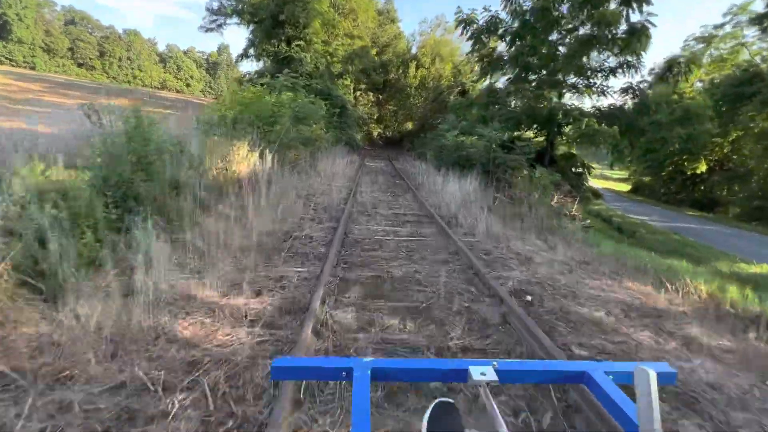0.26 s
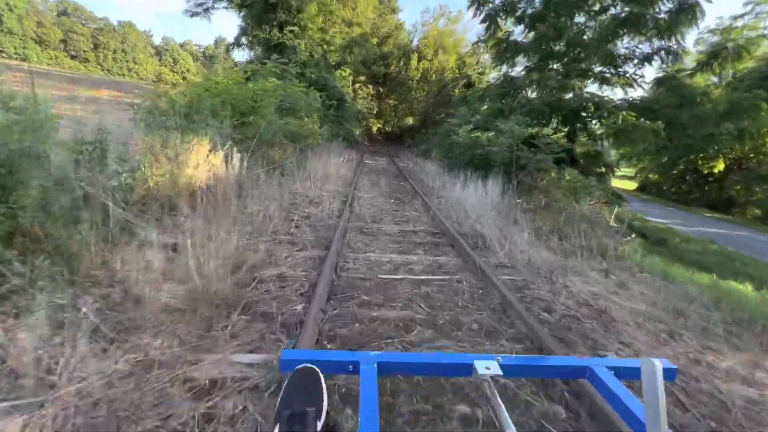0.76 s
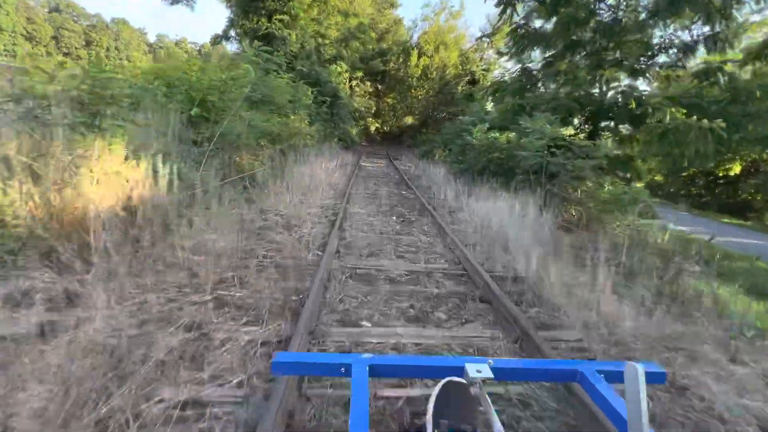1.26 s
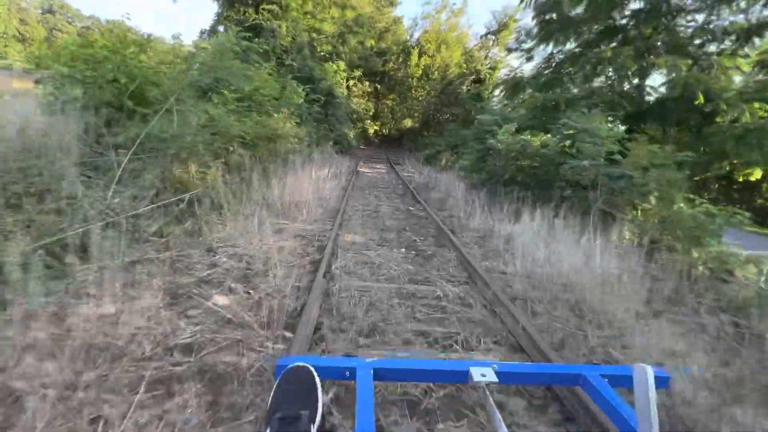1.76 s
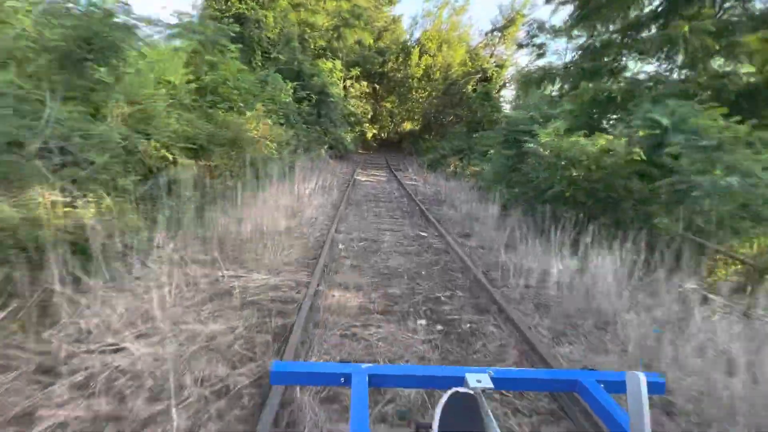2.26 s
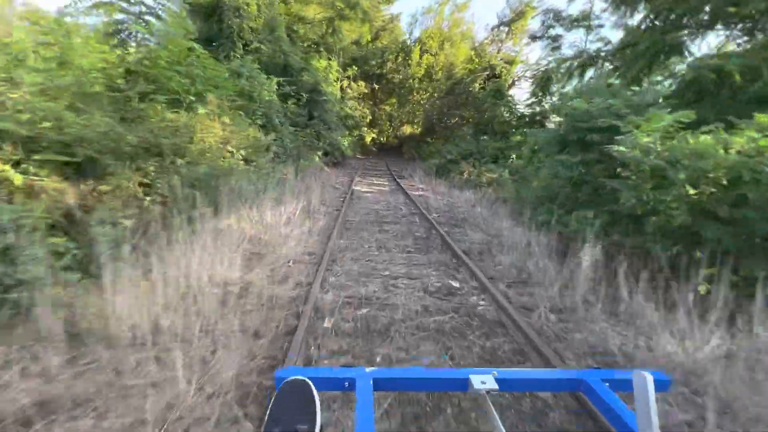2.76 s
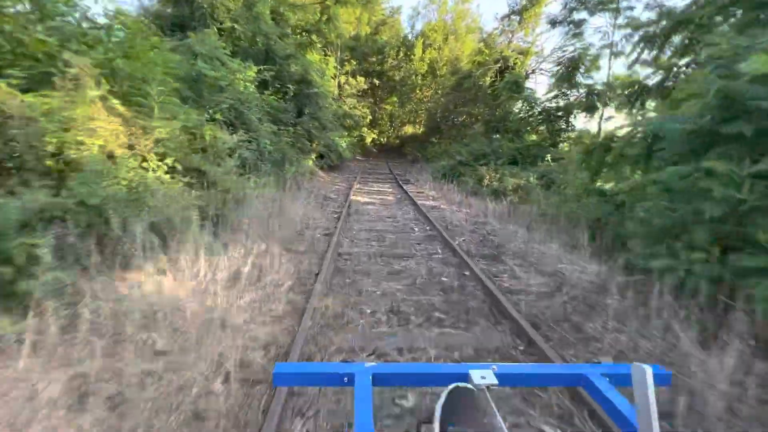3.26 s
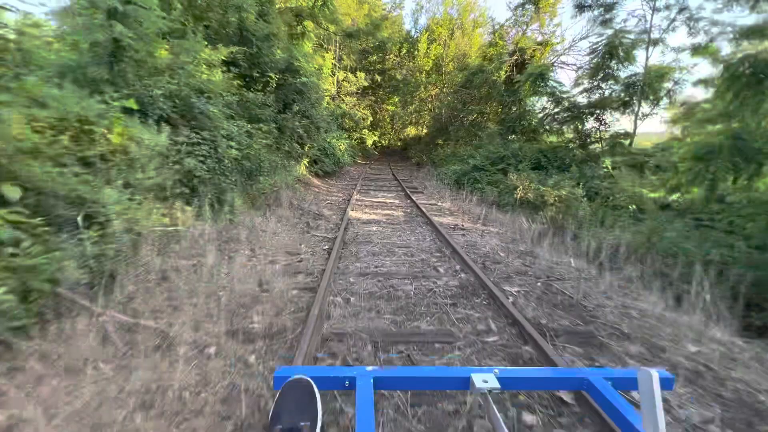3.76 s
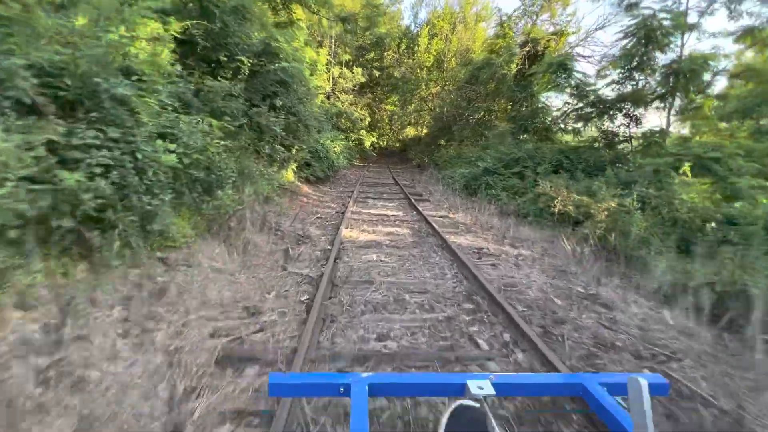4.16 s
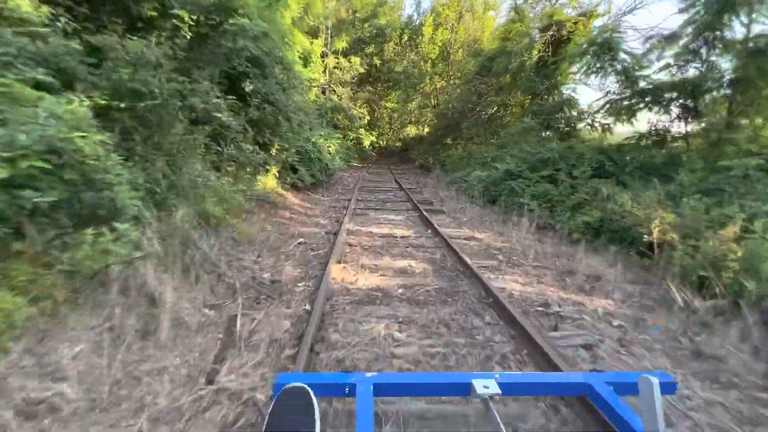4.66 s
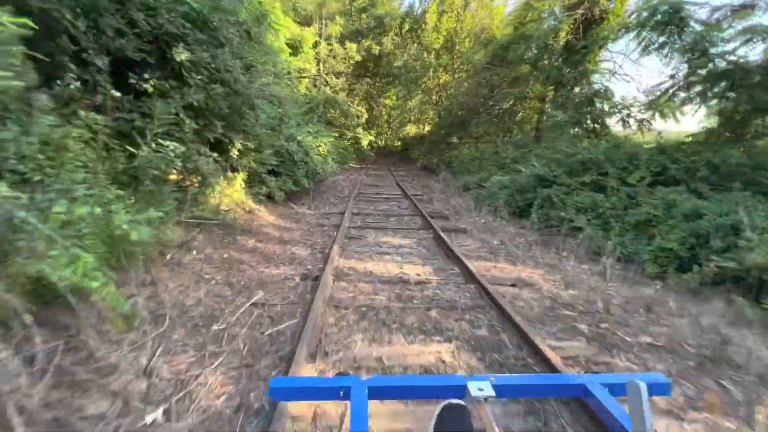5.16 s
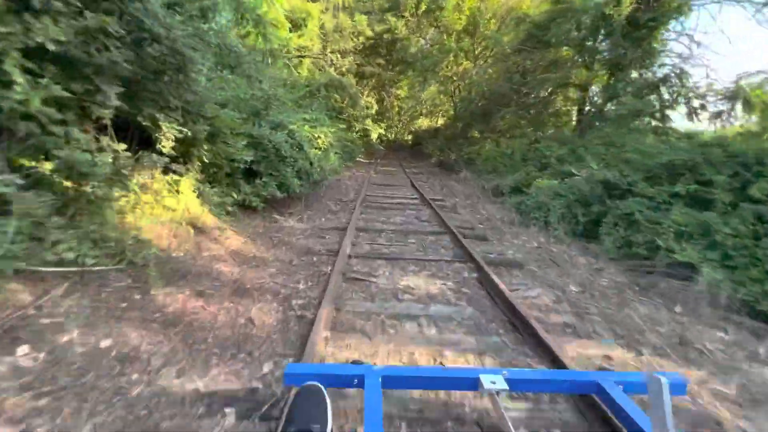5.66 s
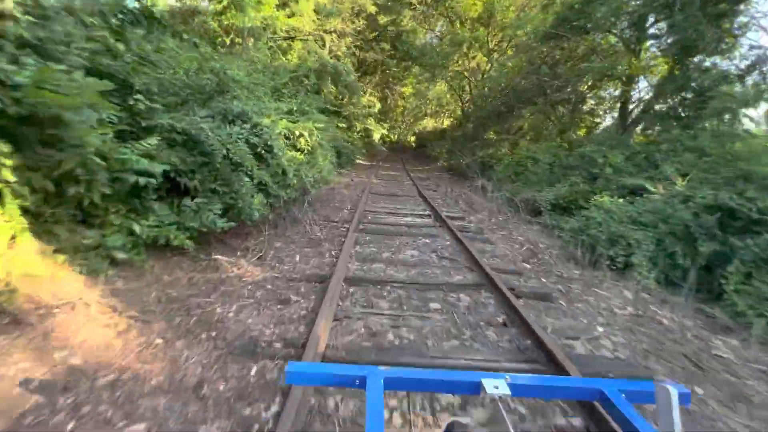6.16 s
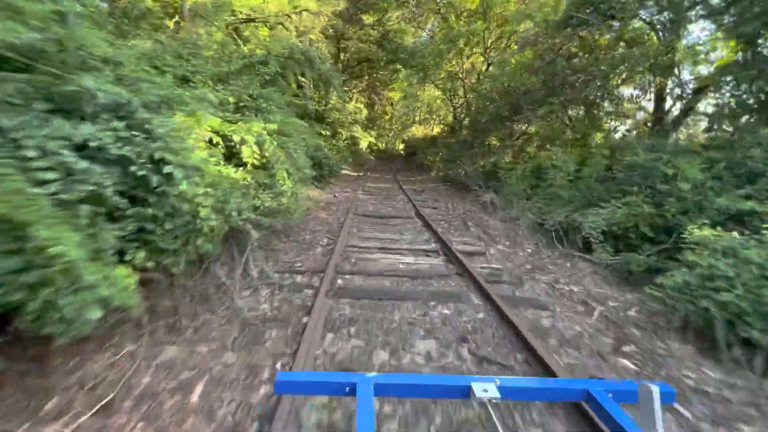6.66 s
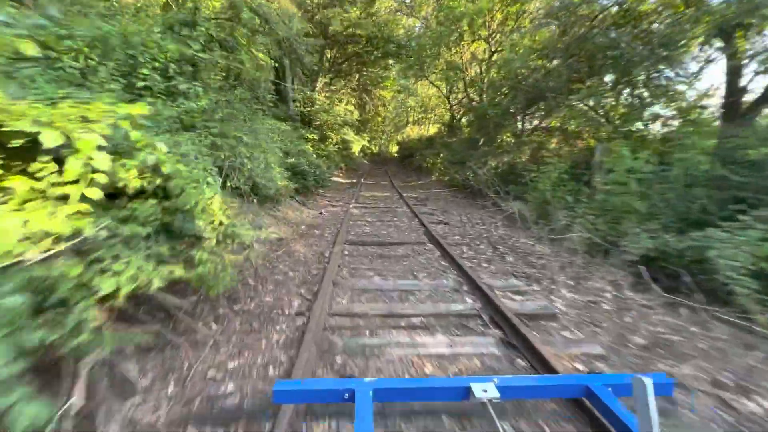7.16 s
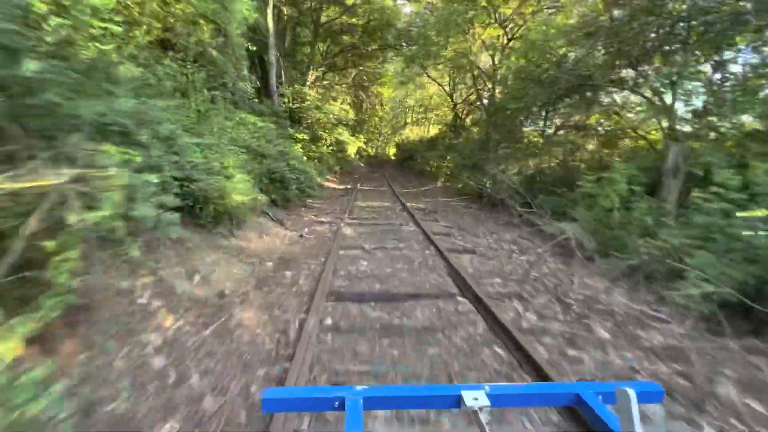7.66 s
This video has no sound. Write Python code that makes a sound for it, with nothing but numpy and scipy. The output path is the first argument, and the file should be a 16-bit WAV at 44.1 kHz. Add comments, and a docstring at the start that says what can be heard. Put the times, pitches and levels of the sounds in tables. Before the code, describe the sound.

Heard from aboard a small open rail cart: steel wheels roar and scrape over rough old rails. Sparse knocks at first, then a hard double clack after one second as the little engine bogs down and recovers. The clacks become frequent and heavy, rattling the loose frame, while a chain ticks finely and dry grass brushes past. Close, dry outdoor stereo.

```python
"""A light steel cart rolls along old rails: steel roars and scrapes as random grit and noise ring its parts.
Wheels knock over joints, a flat spot and rust, each blow a shower of impacts that rattles the loose frame.
A small one-cylinder engine, a sum of exhaust orders, pushes the cart and bogs down once.
A chain ticks over its sprocket as ringing links, and dry grass brushes past as patchy noise with a few snaps.
Two microphone ports pick it up with different colour and phase."""
import sys
import numpy as np
from scipy import signal
from scipy.fft import rfft, irfft, next_fast_len
from scipy.io import wavfile
from scipy.ndimage import uniform_filter1d

SR = 44100
rng = np.random.default_rng(int(sys.argv[2]) if len(sys.argv) > 2 else 0)


def generate_wav(sig):
    """Save sig (samples, or channels by samples) to the path in sys.argv[1] as 16-bit PCM at SR."""
    pcm = np.round(np.clip(np.atleast_2d(sig).T, -1, 1) * 32767).astype(np.int16)
    wavfile.write(sys.argv[1], SR, pcm)


def undo_db(level):
    """Turn decibels back into plain size, where 20 dB means ten times bigger."""
    steps = np.asarray(level, float) / 20
    return 10 ** steps


N = 348831  # length in samples

# How rough the rail runs under the wheels. Each row: time in seconds, roughness in dB.
ROUGHNESS = [(0, -3.5), (.6, -5.5), (1.15, -5.5), (1.5, -1), (2.35, -0.5), (2.7, -2.5), (3.2, 1), (3.6, -1),
             (4.3, 1.5), (6, -0.5), (7.9, 2.5)]
# Resonances of the cart body. Each row: frequency in Hz, bandwidth in Hz, relative level in dB.
BODY_MODES = [(44.8, 29, -20), (75.7, 17.6, 0.5), (110, 26.6, -1.5), (162.4, 40.7, -1.5), (218.5, 31.7, -2),
              (300, 57, -10)]


def read(points, hz):
    """Reads a (Hz, value) curve along a logarithmic frequency axis."""
    f, value = np.transpose(points)
    return np.interp(np.log(hz + 1), np.log(f + 1), value)


def curve(rows, column):
    """Draws one column of a timed table as straight lines over the whole scene."""
    rows = np.array(rows)
    return np.interp(np.arange(N) / SR, rows[:, 0], rows[:, column])


def evened(x):
    """Brings a signal to rms 1."""
    return x / np.sqrt(np.mean(x ** 2) + 1e-20)


def slow(size):
    """Random wander of rms 1, smoothed twice over size samples."""
    wander = uniform_filter1d(rng.standard_normal(N), size)
    return evened(uniform_filter1d(wander, size))


def ring(x, modes):
    """Sum of damped modes driven by x; neighbours have opposite sign."""
    out = np.zeros(len(x))
    for k, (hz, width, db) in enumerate(modes):
        pole = np.exp((2j * np.pi * hz - np.pi * width) / SR)
        mode = signal.lfilter([1], [1, -pole], x).imag
        out += (-1) ** k * undo_db(db) * (1 - abs(pole)) * mode
    return out


def noise(spectrum, patchy_db):
    """Coloured noise of rms 1 from random short-time spectra with drifting patches."""
    real, imag, patches = rng.standard_normal((3, 513, N // 256 + 5))
    patches = uniform_filter1d(patches, 10, axis=0)  # across frequency
    patches = evened(uniform_filter1d(patches, 8, axis=1))  # across time
    colour_db = read(spectrum, np.fft.rfftfreq(1024, 1 / SR))[:, None]
    cells = (real + 1j * imag) * undo_db(colour_db + patchy_db * patches)
    return evened(signal.istft(cells, nperseg=1024, noverlap=768)[1][:N])


def rail_grit():
    """Sparse impulses of random size and sign where rough steel meets rough steel."""
    size = undo_db(-2.5 * np.minimum(rng.exponential(1, N), 5))
    struck = rng.random(N) < 1500 / SR  # 1500 grains per second on average
    return size * struck * rng.choice([-1, 1], N)


def roar(grit):
    """Wide rolling noise and a rail kept singing by grit, both louder on rougher rail."""
    # Colour of the roar. Each row: frequency in Hz, relative level in dB per Hz.
    roar_colour = [(190, -59), (330, 0.5), (386, -15), (484, -2), (795, -6), (1270, 1.5), (1570, -2.5),
                   (2180, -11), (3190, -16), (6490, -17.5), (9800, -26), (12700, -69), (21600, -120)]
    # Resonances of the rail. Each row: frequency in Hz, bandwidth in Hz, relative level in dB.
    rail_modes = [(463, 45, -4), (1156, 136, -6), (1270, 49, 0)]
    base_db, follows = -40, 0.49  # base shared by both layers; dB gained per dB of roughness
    flutter_db = 2.5 * slow(size=600)
    singing = undo_db(-3 + flutter_db) * evened(ring(grit, rail_modes))
    wide = undo_db(2.5) * noise(roar_colour, patchy_db=3.0)
    return undo_db(base_db + follows * curve(ROUGHNESS, column=1)) * (wide + singing)


def scrape_db():
    """The flange presses harder and lets go again with each lean of the swaying cart."""
    # Leans on the rail. Each row: middle in seconds, half length in seconds, dB over the light scrape.
    leans = [(0.02, .45, 11), (1.9, 0.76, 3.2), (4.5, 1.3, 6.2), (7.2, 1.1, 5.5)]
    light_db = -49
    t = np.arange(N) / SR
    return light_db + sum(db * np.exp(-((t - s) / half) ** 2) for s, half, db in leans)


def scrape(grit):
    """The flange resonances ring to the grit, played backwards so that it differs from the rail's."""
    # Resonances of the flange. Each row: frequency in Hz, bandwidth in Hz, relative level in dB.
    flange_modes = [(1740, 390, 3.8), (2135, 390, 8.2)]
    level_db = scrape_db() + 2 * slow(size=600)
    return undo_db(level_db) * evened(ring(grit[::-1], flange_modes))


def shake():
    """The body shakes: noise passes twice through its modes, louder on rougher rail."""
    base_db, follows = -34.5, 1.05  # dB gained per dB of roughness
    level_db = base_db + follows * curve(ROUGHNESS, column=1) + 2 * slow(size=900)
    shaken = ring(rng.standard_normal(N), BODY_MODES)
    return undo_db(level_db) * evened(ring(shaken, BODY_MODES))


def rolling():
    """Rough steel on steel: the same grit sings in the rail and scrapes at the flange while the body shakes."""
    grit = rail_grit()
    return roar(grit) + scrape(grit) + shake()


def blow_parts(clack_hz, thud_db, length, db, chance):
    """One blow: a shower of impacts rings the frame, chatter jingles loose parts, a push thuds in the body."""
    # Resonances of the frame. Each row: frequency in Hz, bandwidth in Hz, relative level in dB.
    frame_modes = [(355, 206, -6), (514, 95, -4), (621, 56, -1), (934, 175, -3.5), (1080, 90, 0),
                   (1270, 62, 0.5), (1510, 129, 1.5), (1878, 240, -3), (2190, 95, -3.5), (2440, 370, -11.5),
                   (3270, 260, -15)]
    # Resonances of the loose parts. Each row: frequency in Hz, bandwidth in Hz, relative level in dB.
    loose_modes = [(3625, 200, 13.4), (4470, 440, 8.2), (5340, 830, 6.3), (6490, 260, 7.7),
                   (6930, 400, 7.7), (8400, 1220, 7.2)]
    near_db, colour_db = 3.5, 2.0  # lift near the blow's pitch; random spread of each mode
    tail_db, tail_s, thud_s = -14, 0.035, 0.0082
    size, hit, push, colour = chance
    t = np.arange(len(size)) / SR

    shape = np.exp(-(t / max(length, .003)) ** 1.04)
    shape += undo_db(tail_db) * np.exp(-t / tail_s)  # longer, weaker chatter
    shape *= np.minimum(t / .0015, 1)  # the wheel climbs the edge
    scraping = hit[::-1] * shape
    impacts = np.convolve(size * (abs(hit) < .04), np.hanning(9), "same") * shape
    shower = impacts + .2 * scraping

    # the blow lands elsewhere each time, so the modes near its pitch stand out
    struck = []
    for (hz, width, gain), c in zip(frame_modes, colour):
        near = near_db * np.exp(-(np.log2(hz / clack_hz) / 0.26) ** 2)
        struck.append((hz, width, gain + near + colour_db * c))
    clack = ring(shower, struck)

    shaken = [(hz, width, gain + colour_db * c) for (hz, width, gain), c in zip(loose_modes, colour[::-1])]
    jingle = ring(scraping * (1 + abs(impacts)), shaken)

    thud_hz = 150 * 2 ** (0.61 * np.tanh(colour[-20]))  # within 0.61 octaves of 150 Hz
    swell = t / thud_s * np.exp(1 - t / thud_s)
    thud = ring(push * swell, BODY_MODES + [(thud_hz, 30, 9)])
    # the jingle gains 2 dB per dB of clack: harder blows shake the small parts more
    return (clack, db), (jingle, -8 + 2 * db), (thud, db + thud_db)


def knocks():
    """Wheels and frame strike steel: blows at joints, from a flat spot and in jolts of the loose frame."""
    # Front and rear wheels cross rail joints. Each row: start in seconds, clack level in dB,
    # clack pitch in Hz, thud over clack in dB, rattle length in seconds.
    joints = [(0.259, -12.5, 614, -3.5, 0.013), (0.392, -15.5, 1020, 6, 0.041),
              (1.293, -10.5, 1220, -1, 0.057), (2.813, -8, 772, -8, 0.014), (3.216, -18.5, 1140, 6.5, 0.03),
              (3.991, -5, 990, -1, .028), (4.387, -8.5, 1060, 2, .023), (5.36, -7, 760, 3.5, 0.031),
              (5.733, -10.5, 710, 0.5, 0.02), (6.449, -7, 1190, -0.5, 0.044),
              (6.814, -7.5, 990, 1.5, 0.023), (7.537, -10.5, 1260, 2, 0.031), (7.889, -20.5, 999, 0, .016)]
    # A flat spot knocks once a wheel turn, closer together as the cart gains speed. Each row:
    # start in seconds, clack level in dB, clack pitch in Hz, thud over clack in dB.
    flat_spot = [(1.741, -8.5, 1090, -3), (2.159, -17.5, 1160, -2.5), (2.578, -17.5, 1240, -1),
                 (3.015, -15, 1167, 0.5), (3.43, -11.5, 1150, -2.5), (3.844, -9, 1070, -4),
                 (4.254, -7, 2127, -3.5), (4.66, -9, 1100, -1), (5.059, -10.5, 1520, 2),
                 (5.454, -11, 960, -4.5), (5.844, -9.5, 1512, -1), (6.224, -9.5, 1510, -6.5),
                 (6.601, -23.5, 1200, 0), (6.987, -22, 1157, 3), (7.362, -12.5, 1490, 1),
                 (7.738, -6.5, 1510, -6.5)]
    # The loose frame drops back after a blow or jolts over rust. Each row:
    # start in seconds, clack level in dB, clack pitch in Hz, thud over clack in dB.
    jolts = [(0.756, -18.5, 1270, -20), (1.325, -5, 1270, -6), (1.362, -9.5, 1320, 2),
             (1.791, -17.5, 1083, 3), (2.015, -24, 509, 1), (2.507, -36.5, 1164, 17.5),
             (2.646, -27, 2190, 12.5), (2.826, -10.5, 1280, 0), (2.864, -11.5, 1840, -17),
             (2.959, -19.5, 525, -5), (3.07, -16.5, 1240, -16), (3.461, -14.5, 1199, -10),
             (4.034, -7.5, 514, -2), (4.412, -14.5, 1066, -0.5), (5.392, -15.5, 1220, 3.5),
             (5.883, -19, 1080, .5), (6.477, -6, 1270, -12), (6.495, -8, 1480, -8),
             (6.865, -16.5, 989, 1.5), (7.731, -13.5, 1260, -11)]
    blows = joints + [row + (.018,) for row in flat_spot]  # rattle length in seconds
    blows += [row + (0.016,) for row in jolts]
    size = 8000  # samples rendered per blow
    out = np.zeros(N + size)
    for s, db, clack_hz, thud_db, length in blows:
        chance = rng.standard_normal((4, size))
        for part, part_db in blow_parts(clack_hz, thud_db, length, db, chance):
            # the loudest 400 samples come to an rms 9 dB under part_db
            loudest = np.sqrt(uniform_filter1d(part ** 2, 400).max() * 8)
            out[round(s * SR):][:size] += undo_db(part_db) * part / loudest
    return out[:N]


def engine():
    """Exhaust pulses as orders of the firing rate; the pipe smears each pulse and each order wavers by itself."""
    # Running of the engine. Each row: time in seconds, firings per second, level in dB under all orders.
    running = [(0, 28.1, -51), (.7, 27.6, -49.5), (1.15, 24.5, -49), (1.32, 27.5, -45), (1.43, 25, -45.5),
               (1.55, 20.3, -39.5), (1.71, 19.7, -41.5), (1.85, 24, -42), (2.04, 27, -39.5),
               (2.16, 27, -45), (5.5, 26.8, -45.5), (7.9, 26.8, -40.5)]
    # Exhaust orders. Each row: multiple of the firing rate, dB over the running level.
    exhaust_orders = [(2, 1.5), (3, -19), (4, 0.5), (5, 2.5), (6, -3), (7, -8.5), (8, 2), (9, -14.5),
                      (10, -8), (11, -15.5), (12, -11.5)]
    turns = np.cumsum(curve(running, column=1)) / SR  # firings so far
    orders = np.zeros(N)
    for k, db in exhaust_orders:
        late = .1 * k ** 2 + .6 * slow(size=5000)  # radians
        orders += undo_db(db + 2.6 * slow(size=4000)) * np.cos(2 * np.pi * k * turns - late)
    return np.sqrt(2) * undo_db(curve(running, column=2)) * orders


def chain():
    """One tick a link; every link seats a little differently, and the level of each ring drifts."""
    # Pace of the chain. Each row: time in seconds, links per second.
    pace = [(0, 38.5), (1, 39.5), (3, 43.4), (4, 44), (6, 48), (7.9, 49)]
    # Resonances of the links. Each row: frequency in Hz, bandwidth in Hz, relative level in dB.
    link_modes = [(3795, 39, 5), (5640, 106, -2.5), (6200, 76, 1.5), (6690, 67, 1)]
    uneven_db, drift_db, seat_s = 5.5, -0.5, 0.0014
    links = np.cumsum(curve(pace, column=1)) / SR
    at = np.flatnonzero(np.diff(np.floor(links)))
    sizes = undo_db(uneven_db * np.clip(rng.standard_normal((len(at), len(link_modes))), -2, 2))
    seat = np.exp(-np.arange(300) / SR / seat_s)
    out = np.zeros(N)
    for mode, size in zip(link_modes, sizes.T):
        ticks = np.zeros(N)
        ticks[at] = size
        scuff = signal.oaconvolve(ticks, seat)[:N] * rng.standard_normal(N)
        out += undo_db(drift_db * slow(size=5000)) * ring(scuff, [mode])
    return undo_db(-51.5) * evened(out)


def grass():
    """Dry stalks swish along the frame as noise in uneven strokes; a few snap in short noise bursts."""
    # Colour of the swish. Each row: frequency in Hz, relative level in dB per Hz.
    swish_colour = [(5000, -23), (8000, 8), (11500, 0.5), (16000, -4)]
    # How thick the grass stands. Each row: time in seconds, thickness in dB (the swish lies 7 dB higher).
    stalks = [(0, -60), (1.5, -59), (2.35, -53), (3.2, -56.5), (3.6, -56), (6, -60), (7.9, -58)]
    # Stems snap on the frame. Each row: start in seconds, level in dB of the noise that is then sharpened.
    snaps = [(1.6575, -25.5), (1.8743, -35), (2.065, -34), (2.926, -30)]
    strokes_db = 1.9 * slow(size=400)
    out = undo_db(curve(stalks, column=1) + 7.0 + strokes_db) * noise(swish_colour, patchy_db=-2.5)
    t = np.arange(400) / SR
    for s, db in snaps:
        crack = np.convolve(rng.standard_normal(len(t)), [1, 0, -1], "same")
        snap = undo_db(db) * crack * np.exp(-t / 0.0013)
        part = out[round(s * SR):][:len(t)]
        part += snap[:len(part)]
    return out


def scene():
    """The many rattling parts sound once as both ports hear them and once as only the right port does."""
    return np.array([rolling() + knocks() + engine() + chain() + grass() for _ in range(2)])


def band_limit(x):
    """A steep low-pass at the top of the band."""
    return signal.sosfilt(signal.butter(12, 16950, fs=SR, output="sos"), x)


def record(dry):
    """Low and high cut; the ports differ in colour and phase and share only part of the sound field."""
    # The two ports. Each row: frequency in Hz, left over right in dB, likeness from 0 to 1,
    # lead of the left in radians.
    port_rows = [(40, 2, .3, -.2), (100, -.5, .6, -.4), (200, -1.5, .86, -.6), (500, -2, .6, -1.1),
                 (700, -6.5, .7, -1.7), (1200, 3, .85, -1.5), (1800, 7, .85, -3.1), (2240, 8, .7, -4.6),
                 (3790, 9, .3, -6.4), (6400, 13, .35, -11.7), (8000, 2, .3, -15), (8800, -6, .25, -18),
                 (9500, -4, .4, -20.5), (10200, -1, .95, -22), (11000, 0, .98, -23.5),
                 (16500, 0, .98, -33.7)]
    size = next_fast_len(N)
    freqs = np.fft.rfftfreq(size, 1 / SR)
    low_cut = signal.butter(3, 45, "high", fs=SR, output="sos")
    high_cut = freqs < 15900
    direct, scattered = rfft(signal.sosfilt(low_cut, dry), size) * high_cut
    hz, *columns = np.transpose(port_rows)
    tilt_db, same, lead = (np.interp(freqs, hz, c) for c in columns)
    same = np.clip(same, 0, 1)
    left = direct * undo_db(tilt_db / 2)
    right = (same * direct + np.sqrt(1 - same ** 2) * scattered) * np.exp(-1j * lead)
    right = right * undo_db(-tilt_db / 2)
    ports = irfft(np.array([left, right]), size)[:, :N]
    return band_limit(ports)


dry = scene()
out = record(dry)
generate_wav(out)
```